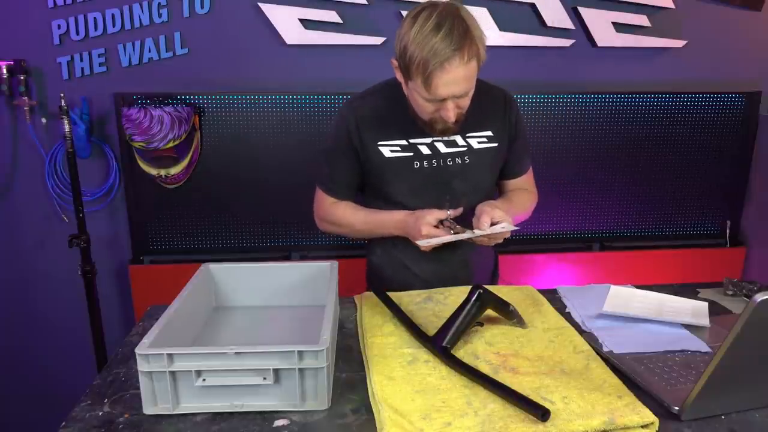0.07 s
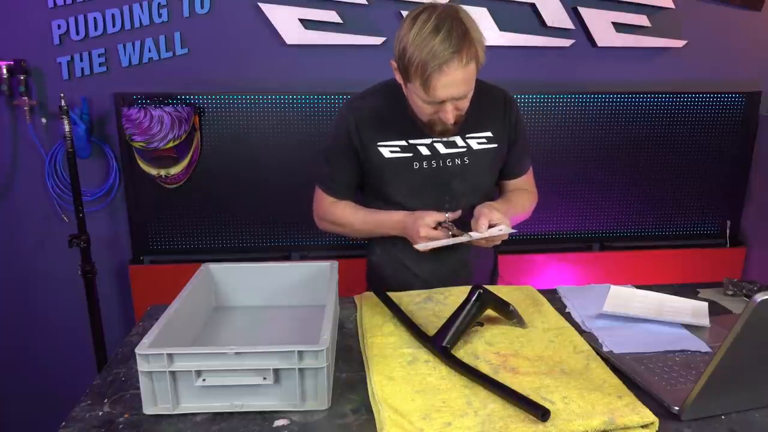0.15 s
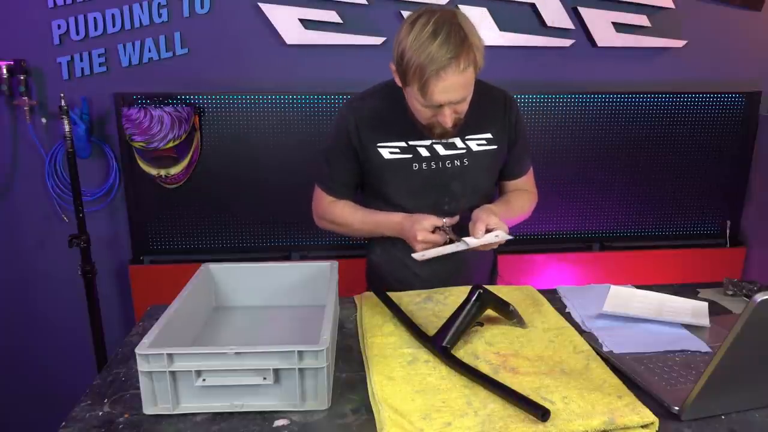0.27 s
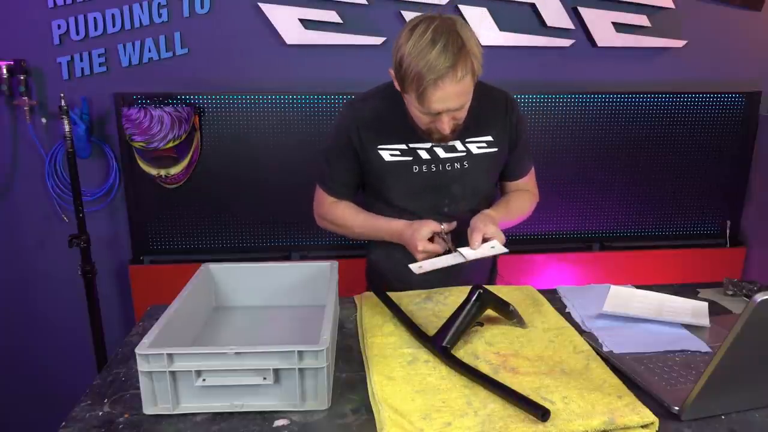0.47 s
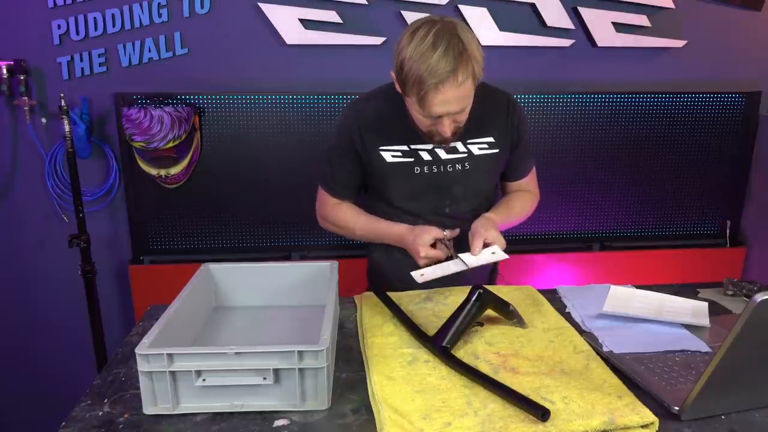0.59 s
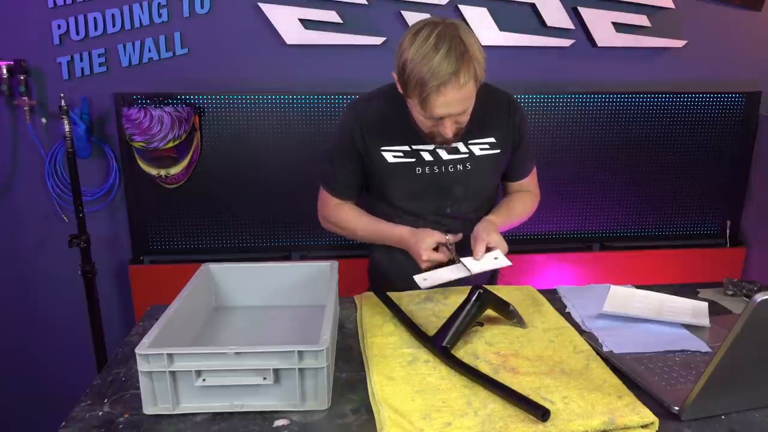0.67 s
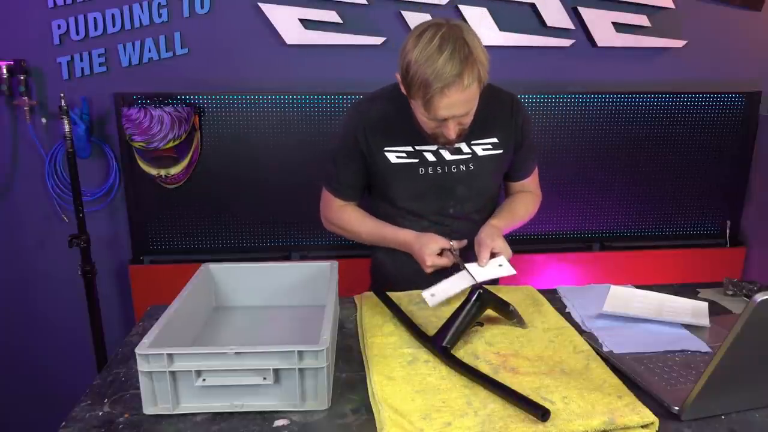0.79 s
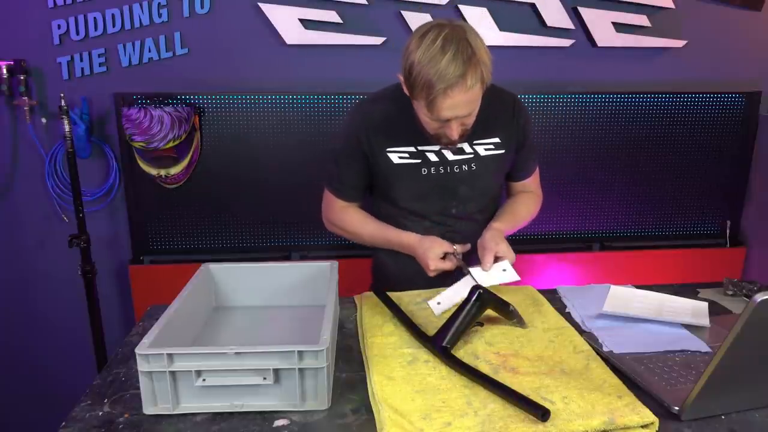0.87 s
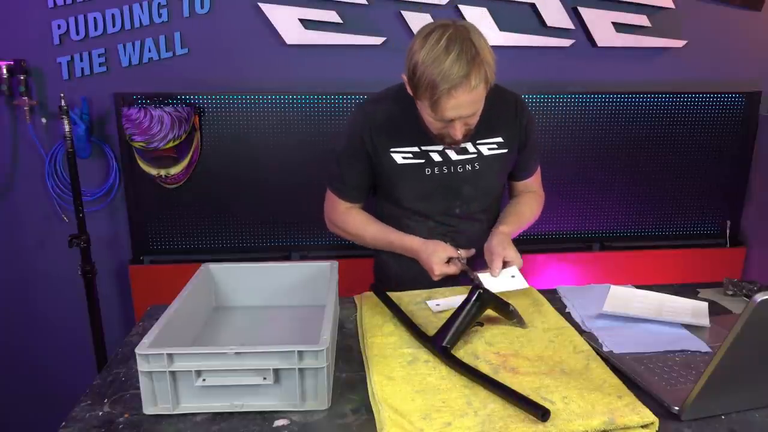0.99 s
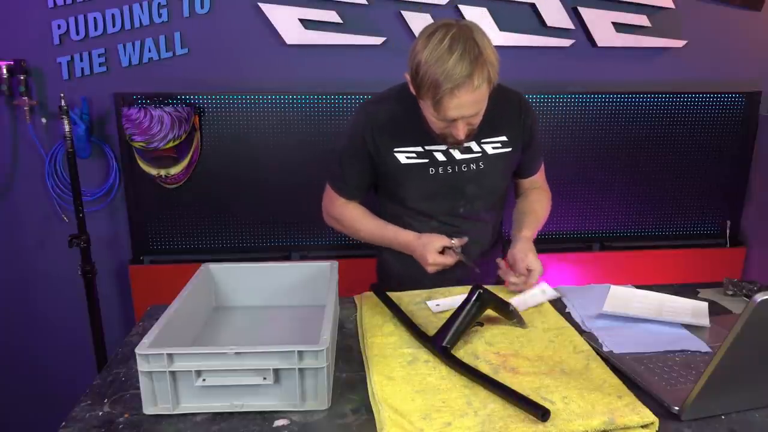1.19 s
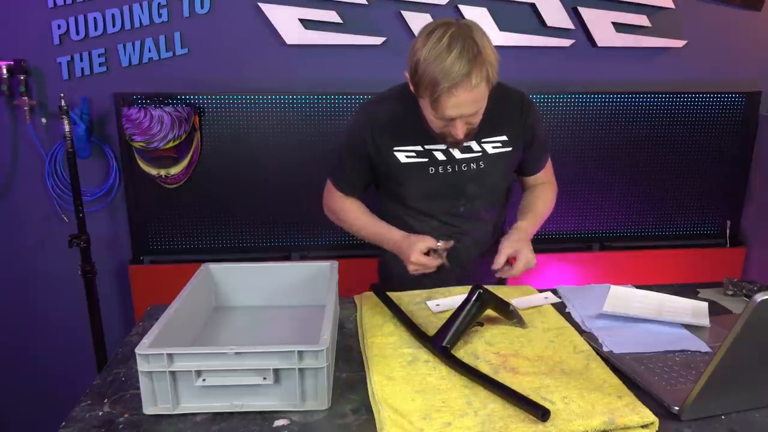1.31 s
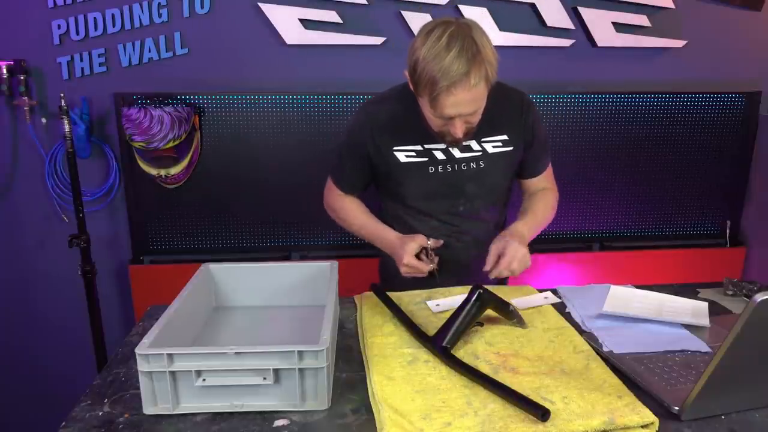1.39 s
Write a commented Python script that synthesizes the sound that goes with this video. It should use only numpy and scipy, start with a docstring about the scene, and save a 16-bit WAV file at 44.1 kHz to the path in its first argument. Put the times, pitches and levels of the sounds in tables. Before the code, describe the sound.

Two crunchy scissor cuts snap through stiff paper in a small, quiet room.

```python
"""Scissors make two cuts through stiff paper at a workbench in a small, quiet room. Stick-slip motion of the
blades breaks fibres, and these impulses excite the resonances of sheet and steel. Each cut ends in a snap: a
dull knock, a steel click and the free vibration of blades and paper. The blades scrape on each other and tick
lightly as they are moved away; the hands rustle and thump, and the cut-off strip drops onto a cloth with a low
thump and brushes across it. Bench and walls add reflections and a short decay."""
import sys
import numpy as np
from scipy import signal
from scipy.fft import rfft, irfft
from scipy.io import wavfile

SR = 44100
rng = np.random.default_rng(int(sys.argv[2]) if len(sys.argv) > 2 else 0)


def master_out(mix):
    """Clip the mix to full scale and print it as 16-bit PCM to the path in sys.argv[1]."""
    frames = np.transpose(np.atleast_2d(mix))
    ceiling = np.clip(frames, -1, 1)
    pcm = np.round(ceiling * 32767).astype(np.int16)
    wavfile.write(sys.argv[1], SR, pcm)


N = 63945

# the snap that ends each cut: start_s, knock_db, ring_db, click_db
SNAP_EVENTS = [(0.436, 16.5, -38, -44), (0.9366, -41, -17.5, -14)]


def amp(db):
    """Amplitude grows tenfold for every 20 dB."""
    return 10 ** (np.asarray(db) / 20)


def unit(x):
    """Normalisation to an rms of 1."""
    return x / np.sqrt(np.mean(x ** 2) + 1e-20)


def read(points, hz):
    """Interpolation of a curve on a logarithmic frequency axis."""
    frequency, value = np.transpose(points)
    return np.interp(np.log(hz + 1), np.log(frequency + 1), value)


def add(mix, start_s, sound):
    """Superposition: a sound adds to the mix from its start time."""
    part = mix[max(round(start_s * SR), 0):][:len(sound)]
    part += sound[:len(part)]


def colour(spectrum, size=4096):
    """Minimum-phase impulse response: the phase follows from the log gain by a Hilbert transform."""
    log_gain = np.log(amp(read(spectrum, abs(np.fft.fftfreq(size, 1 / SR)))))
    return np.fft.ifft(np.exp(np.conj(signal.hilbert(log_gain)))).real[:size // 2]


def resonances(table, size=2048):
    """Impulse response of damped resonators: the wider the band, the faster the decay."""
    t = np.arange(size) / SR
    return sum(amp(db) * np.sqrt(width) * np.exp(-np.pi * width * t) * np.sin(2 * np.pi * hz * t)
               for hz, width, db in table)


def modes(table, length_s=0.061):
    """Free vibration is a sum of exponentially decaying normal modes."""
    t = np.arange(0, length_s, 1 / SR)
    return sum(amp(db - 60 * t / t60) * np.sin(2 * np.pi * hz * t) for hz, db, t60 in table)


def disperse(x, hz, width_hz):
    """Dispersion of bending waves: an all-pass filter delays the band around one frequency."""
    radius = np.exp(-np.pi * width_hz / SR)
    poles = [1, -2 * radius * np.cos(2 * np.pi * hz / SR), radius * radius]
    return signal.lfilter(poles[::-1], poles, x)


def swell(length_s, edge_s=0):
    """An arched amplitude envelope that overhangs a stroke by an edge at each end."""
    span_s = length_s + 2 * edge_s
    return np.sin(np.pi * np.arange(0, span_s, 1 / SR) / span_s) ** 0.67


def burst(stream, start_s, length_s, level_db, edge_s):
    """Amplitude modulation shapes a steady stream into one stroke; returns its onset and sound."""
    envelope = swell(length_s, edge_s)
    stretch = np.resize(np.roll(stream, -round(start_s * SR)), len(envelope))
    return start_s - edge_s, amp(level_db) * unit(envelope * stretch)


def shot_noise(response, rate_per_s=7000, spread_db=3):
    """Shot noise: tiny impulses of uneven size excite a response at random times."""
    size_db = spread_db * np.minimum(rng.exponential(1, N), 4)
    impulses = amp(size_db) * rng.choice([-1., 1.], N) * (rng.random(N) < rate_per_s / SR)
    return signal.fftconvolve(impulses, response / np.linalg.norm(response))[:N]


def room_noise(level_db=-63):
    """Stationary coloured noise: a low rumble and a soft hiss."""
    # background spectrum: frequency_hz, density_db
    spectrum = [(20, -2.5), (55, 7.5), (80, -0.5), (140, -6), (290, -10), (370, -11.5), (500, -9),
                (1000, -5.5), (1800, -8), (3000, -18), (5000, -24.5), (10000, -26.5), (16000, -28.5)]
    gain = amp(read(spectrum, np.fft.rfftfreq(N, 1 / SR)))
    return amp(level_db) * unit(irfft(rfft(rng.standard_normal(N)) * gain, N))


def sheet(hz, width_hz=107, evenness=0.63):
    """Forced vibration of the sheet at its resonance; the grip of the blades evens out its swing."""
    swing = shot_noise(resonances([(hz, width_hz, 0)]))[:SR // 4]
    band = signal.butter(2, [hz / 2, hz * 3 / 2], "band", fs=SR)
    analytic = signal.hilbert(signal.lfilter(*band, swing))
    gripped = analytic.real / (abs(analytic) + 1e-9) ** evenness
    return signal.lfilter(*band, gripped)[SR // 20:]  # steady state only


def cutting(edge_s=0.003):
    """Stick-slip cutting, a rebound and a flex each crackle and excite the sheet and the blades."""
    # slips of the cuts, plus a rebound click (0.449 s) and a flex of the sheet (0.492 s) after the
    # first snap: start_s, length_s, sheet_db, sheet_hz, crackle_db, blade_db
    excitations = [(0.034, 0.015, -93, 1480, -59, -67), (0.058, 0.017, -82, 1180, -62, -68),
                   (0.08, 0.017, -63, 1430, -62, -65.5), (0.112, 0.0091, -60, 726, -53, -61.5),
                   (0.129, 0.016, -79, 1000, -62, -65.5), (0.153, 0.007, -52, 1030, -53.5, -59),
                   (0.169, 0.022, -66, 1010, -62, -61.5), (.178, 0.0018, -52, 950, -56, -82),
                   (0.195, 0.017, -56, 1370, -58.5, -63), (0.213, 0.017, -49, 1394, -53.5, -64.5),
                   (0.236, 0.011, -42, 1496, -48.5, -69), (0.2628, 0.0053, -46.5, 1830, -45.5, -69),
                   (0.275, 0.019, -55, 2030, -53.5, -70), (0.449, 0.0048, -42.5, 870, -44, -54),
                   (0.492, 0.024, -50, 1100, -59, -75), (0.68, 0.01, -56.5, 1700, -59.5, -60.5),
                   (0.69, 0.017, -50.5, 1320, -51.5, -63.5), (0.715, 0.0072, -47, 1266, -53, -65),
                   (0.725, 0.0057, -43.5, 1230, -59, -66), (0.739, 0.0076, -42.5, 1067, -51, -79),
                   (0.753, 0.016, -44, 1073, -56, -72), (0.772, 0.0042, -70, 1020, -56.5, -77),
                   (0.796, 0.0048, -43, 1028, -50, -61.5), (0.818, 0.011, -51.5, 1290, -58, -71),
                   (0.828, 0.01, -53.5, 772, -60, -77), (0.855, 0.0044, -49.5, 1090, -63, -66),
                   (0.86, 0.0062, -55, 1110, -56.5, -70), (0.877, 0.0036, -76, 1190, -54, -70),
                   (0.889, 0.008, -68, 1120, -55, -73), (.922, 0.0047, -50.5, 1420, -52.5, -75)]
    # sustained crunch under the cuts: start_s, length_s, crackle_db, blade_db
    crunches = [(0.173, 0.13, -57, -74), (0.677, 0.11, -57.5, -69.5)]
    # spectrum of crackling fibres: frequency_hz, density_db
    crackle_spectrum = [(100, -8.5), (350, 1.5), (550, 3), (1000, 4), (2000, 2.5), (3100, -8.5),
                        (4300, -6.5), (5200, -16.5), (6200, -18), (8300, -27), (9500, -20.5), (16000, -19)]
    # blade resonances: frequency_hz, width_hz, gain_db
    blade_resonances = [(4200, 410, -1), (5630, 400, 3.5), (7310, 700, 11.5), (10080, 160, -2),
                        (12530, 140, -3), (14600, 1900, 3)]
    out = np.zeros(N)
    crackle = shot_noise(colour(crackle_spectrum))
    steel = shot_noise(resonances(blade_resonances))
    for start, length, sheet_db, sheet_hz, crackle_db, blade_db in excitations:
        for stream, db in (sheet(sheet_hz), sheet_db), (crackle, crackle_db), (steel, blade_db):
            add(out, *burst(stream, start, length, db, edge_s))
    for start, length, crackle_db, blade_db in crunches:
        for stream, db in (crackle, crackle_db), (steel, blade_db):
            add(out, *burst(stream, start, length, db, edge_s))
    return out


def click(spectrum, t60_s, size=2048):
    """Impact of steel on steel: broadband chatter that decays exponentially."""
    chatter = rng.choice([-1., 1.], size) * amp(-60 * np.arange(size) / SR / t60_s)
    return signal.fftconvolve(chatter / np.linalg.norm(chatter), colour(spectrum))


def ticks():
    """Light impacts of the blades give a crisp click and excite two heavily damped modes."""
    # blade contacts: start_s, click_db, ring_db
    contacts = [(0.4294, -38, -43), (1.0251, -23, -43.5), (1.2712, -34, -55)]
    # click spectrum: frequency_hz, gain_db
    spectrum = [(200, -25), (1500, -23), (2400, 1), (3600, -2), (6500, -3), (8700, -7), (10000, -8.5),
                (16000, -13)]
    # modes of the scissors: pitch_hz, level_db, t60_s
    ring_modes = [(2170, -0.5, 0.014), (2410, -5, 0.016)]
    out = np.zeros(N)
    for start, click_db, ring_db in contacts:
        add(out, start, amp(click_db) * click(spectrum, t60_s=0.011))
        add(out, start, amp(ring_db) * modes(ring_modes))
    return out


def rustling():
    """Sliding friction of paper on the fingers gives soft bursts of noise."""
    # brushing strokes: start_s, length_s, level_db
    strokes = [(0.432, 0.02, -53.5), (0.605, 0.012, -60), (1.085, 0.12, -66.5)]
    # rustle spectrum: frequency_hz, density_db
    spectrum = [(100, -5), (600, -3.5), (1800, 6), (3000, -7), (8000, -22), (16000, -32)]
    out = np.zeros(N)
    rustle = shot_noise(colour(spectrum))
    for start, length, db in strokes:
        add(out, *burst(rustle, start, length, db, edge_s=0.01))
    return out


def knocks():
    """Impulse excitation: the blades break through the sheet's edge with a dull, hollow knock."""
    # knock spectrum: frequency_hz, gain_db
    spectrum = [(60, -26), (200, -22.5), (380, -6), (520, -3.5), (720, 0.5), (1100, -3), (1800, -2.5),
                (2700, -16.5), (3500, -24.5), (4400, -22), (5500, -34), (6100, -36.5), (6900, -43),
                (8000, -25.5), (9500, -44), (16000, -59)]
    # hollow ring under the knock: pitch_hz, level_db, t60_s
    hollow_modes = [(316, -49.5, 0.086), (465, -52, 0.037), (698, -53, 0.064), (936, -52, 0.078)]
    out = np.zeros(N)
    knock = disperse(colour(spectrum), hz=1600, width_hz=1400)
    for start, knock_db, _, _ in SNAP_EVENTS:
        add(out, start, amp(knock_db) * knock)
        add(out, start, amp(knock_db) * modes(hollow_modes))
    return out


def snaps():
    """Sudden release: the strip springs free and the blades click shut, each ringing in its modes."""
    # modes of the paper strip: pitch_hz, level_db, t60_s
    strip_modes = [(473, -20.5, 0.034), (778, -24, 0.11), (950, -14, 0.062), (1444, -0.9, 0.03),
                   (1693, -5, 0.02), (1833, -12.5, 0.022)]
    # modes of the closing blades: pitch_hz, level_db, t60_s
    blade_modes = [(3210, -26.5, 0.027), (5720, -26, 0.021), (6800, -33, 0.015), (10700, -31, 0.014),
                   (15300, -29, 0.011)]
    # spectrum of the steel click: frequency_hz, gain_db
    click_spectrum = [(200, -28), (1500, -22), (2400, 4), (3200, 1), (4700, -12), (6200, 0.5), (8500, -11),
                      (10500, -10), (16000, -12)]
    out = np.zeros(N)
    strip = signal.sosfilt(signal.butter(12, 1985, fs=SR, output="sos"), modes(strip_modes))
    strip = disperse(strip, hz=1190, width_hz=480)
    ring = signal.lfilter(*signal.butter(2, 364, "high", fs=SR), strip + modes(blade_modes))
    for start, _, ring_db, click_db in SNAP_EVENTS:
        add(out, start, amp(ring_db) * ring)
        add(out, start, amp(click_db) * click(click_spectrum, t60_s=0.02))
    return out


def scraping():
    """Friction of steel on steel drives the blades as they reopen and late in the second cut."""
    # sliding contacts: start_s, length_s, level_db
    strokes = [(0.449, 0.15, -67.5), (0.793, 0.0032, -59), (0.818, 0.019, -57), (.854, 0.0044, -58.5),
               (0.864, .004, -54.5), (0.877, 0.0019, -60), (0.888, 0.007, -57.5), (.912, 0.023, -58)]
    # resonances of the rubbing blades: frequency_hz, width_hz, gain_db
    steel_resonances = [(2730, 300, -7), (3170, 1000, 13), (4700, 130, 4), (6010, 540, 7), (7430, 690, 2)]
    out = np.zeros(N)
    steel = shot_noise(resonances(steel_resonances))
    steel = signal.sosfilt(signal.butter(4, [2200, 9500], "band", fs=SR, output="sos"), steel)
    for start, length, db in strokes:
        add(out, *burst(steel, start, length, db, edge_s=0.0027))
    return out


def thumps():
    """Soft, slow contacts of the hands, and the strip dropping onto the cloth, put their energy into a few low-
    frequency cycles."""
    # low pulses of the hands and of the strip landing on the cloth (1.362 s): start_s, level_db, pitch_hz,
    # length_s
    pulses = [(1.027, -46.5, 49.7, 0.091), (1.28, -46.5, 61.3, 0.039), (1.362, -38, 39.2, 0.05)]
    out = np.zeros(N)
    for start, db, hz, length in pulses:
        t = np.arange(0, length, 1 / SR)
        add(out, start, amp(db) * np.sin(np.pi * t / length) * np.sin(2 * np.pi * hz * t))
    return out


def landing(start_s=1.362, length_s=0.097, level_db=-62.5):
    """Friction of the strip on the cloth gives one broadband swish."""
    # swish spectrum: frequency_hz, density_db
    spectrum = [(200, -15), (700, -6), (2200, 1), (4400, -6), (7000, 0), (10000, 2.5), (11200, -6),
                (16000, -7)]
    out = np.zeros(N)
    onset, swish = burst(shot_noise(colour(spectrum)), start_s, length_s, level_db=0, edge_s=0)
    add(out, onset, amp(level_db) * unit(swish * swell(length_s)))
    return out


def squeaks(width_hz=57):
    """Friction of the sliding strip gives thin squeaks: narrow bands of noise that glide in pitch."""
    # squeaks on the cloth: start_s, length_s, mid_pitch_hz, glide_hz_per_s, level_db
    glides = [(1.370, .026, 1170, -2000, -57), (1.380, 0.014, 5000, 20000, -62),
              (1.375, 0.028, 8900, -18000, -65), (1.374, .015, 6850, 15000, -67),
              (1.394, .030, 2100, -1000, -61), (1.408, 0.012, 3750, 55000, -62),
              (1.407, .024, 8050, -50000, -64), (1.405, .014, 820, -8000, -56)]
    out = np.zeros(N)
    pole = np.exp(-np.pi * width_hz / SR)
    for start, length, hz, glide, db in glides:
        envelope = swell(length)
        pitch = hz + glide * (np.arange(len(envelope)) / SR - length / 2)
        carrier = np.exp(2j * np.pi * np.cumsum(pitch) / SR)
        complex_noise = [1, 1j] @ rng.standard_normal((2, N))
        flutter = signal.lfilter([1], [1, -pole], complex_noise)[-len(envelope):]
        add(out, start, amp(db) * unit(envelope * (flutter * carrier).real))
    return out


def room(x, tail_db):
    """Reverberation: direct sound, early reflections and a diffuse tail from the far walls."""
    # reflections from bench and walls: delay_s, gain_db
    reflections = [(.00159, -43.5), (.00313, -18), (.00379, -22), (.00453, -27.5), (.00561, -19),
                   (.00867, -23), (0.0122, -18.5), (0.0154, -20.5)]
    # reverberation time: frequency_hz, t60_s
    decay_times = [(150, 0.44), (600, 0.49), (1500, 0.4), (4000, 0.7), (9000, 0.52), (16000, 0.17)]
    hz, t, noise = signal.stft(rng.standard_normal(SR // 2), SR, nperseg=256)
    decay = amp(-60 * t / read(decay_times, hz)[:, None])
    tail = signal.istft(noise * decay, SR, nperseg=256)[1]
    response = np.zeros(SR)
    response[0] = 1
    add(response, start_s=0.013, sound=amp(tail_db) * tail / np.linalg.norm(tail))
    for delay, db in reflections:
        add(response, delay, amp([db]))
    return signal.fftconvolve(x, response)[:N]


def scene():
    """Superposition of all sources, filtered by bench and room, over the steady background."""
    # hollow colour of bench and room: frequency_hz, gain_db
    bench_response = [(200, -9), (290, -5.5), (375, -16), (465, 0), (560, -2)]
    rubbing = cutting() + scraping() + rustling() + thumps() + landing() + squeaks()
    sound = room(rubbing, tail_db=-14.5) + room(knocks(), tail_db=-14.5)
    sound += room(snaps() + ticks(), tail_db=-17)
    coloured = signal.fftconvolve(sound, colour(bench_response))[:N]
    return (coloured + room_noise())[None]


def record(dry):
    """Band limiting: a linear-phase low-pass filter removes the treble above 15.9 kHz."""
    low_pass = signal.firwin(511, 15900, window=("kaiser", 9), fs=SR)
    return signal.oaconvolve(dry, low_pass[None], "same")


dry = scene()
out = record(dry)
master_out(out)
```